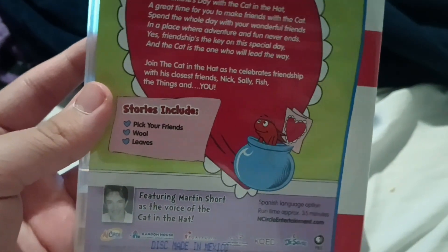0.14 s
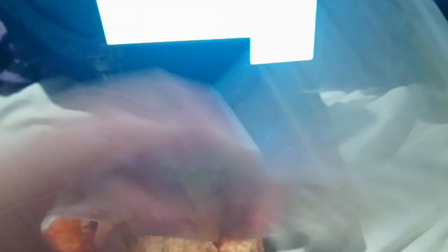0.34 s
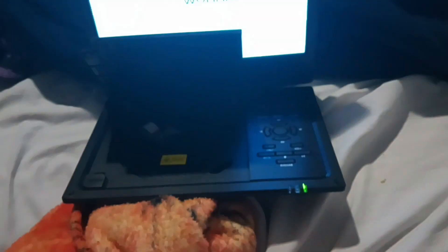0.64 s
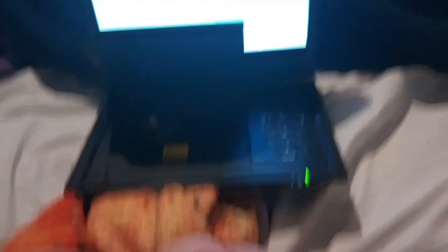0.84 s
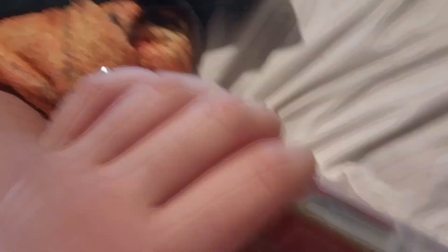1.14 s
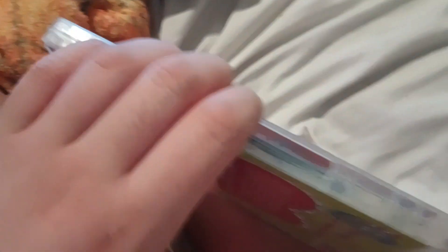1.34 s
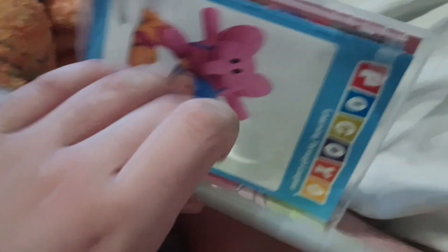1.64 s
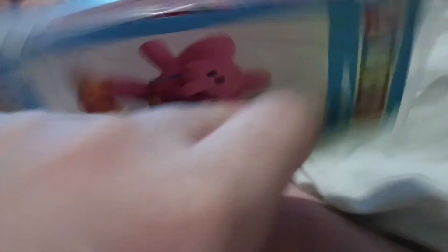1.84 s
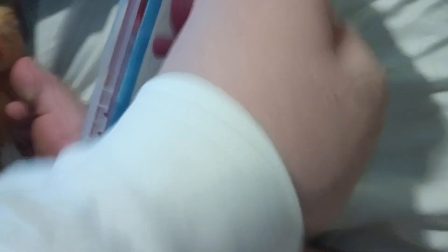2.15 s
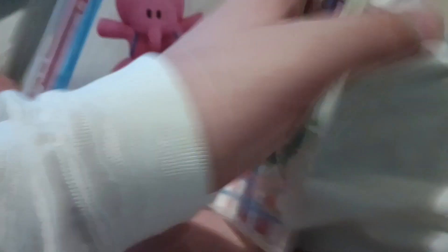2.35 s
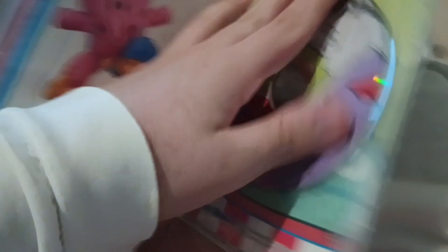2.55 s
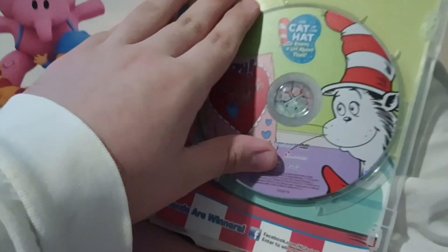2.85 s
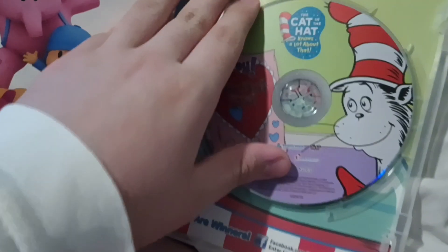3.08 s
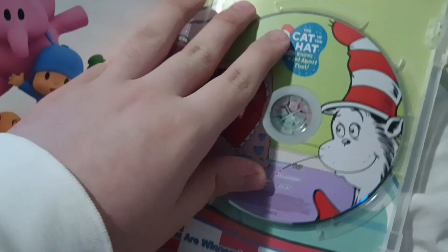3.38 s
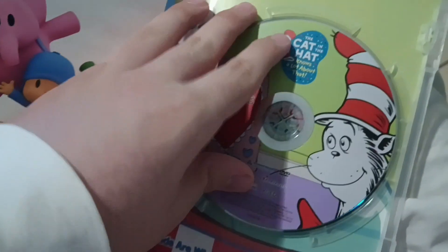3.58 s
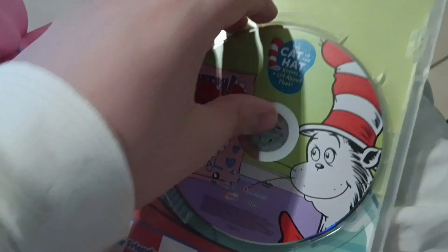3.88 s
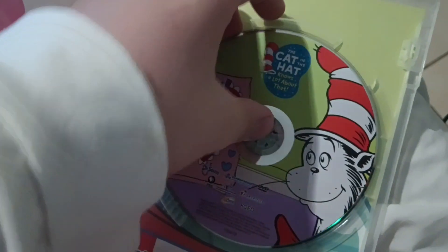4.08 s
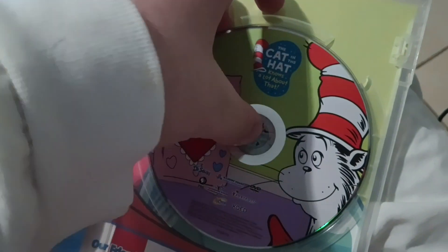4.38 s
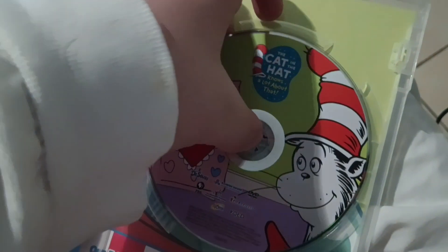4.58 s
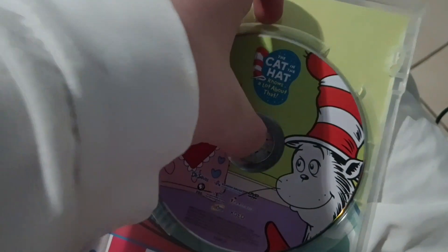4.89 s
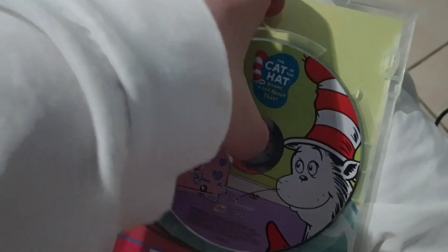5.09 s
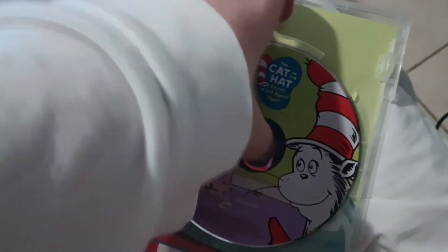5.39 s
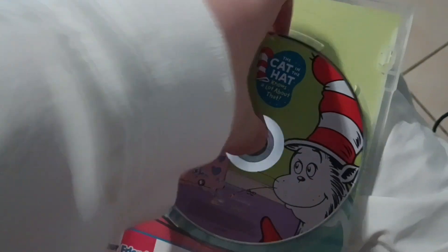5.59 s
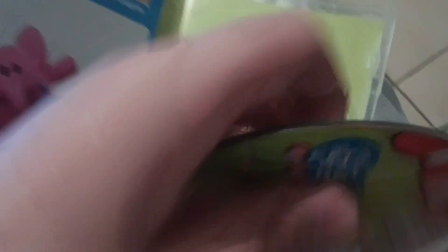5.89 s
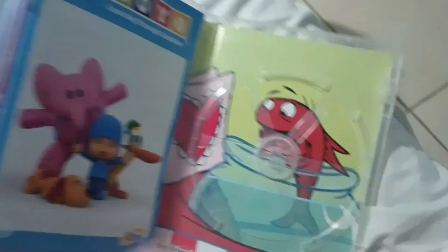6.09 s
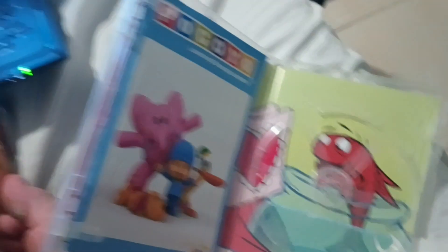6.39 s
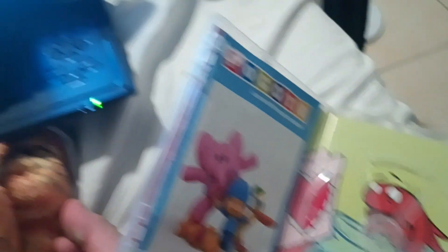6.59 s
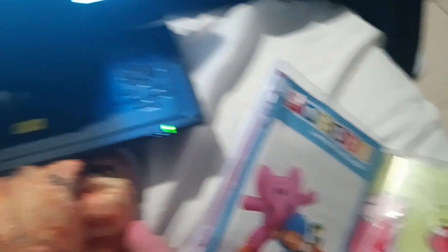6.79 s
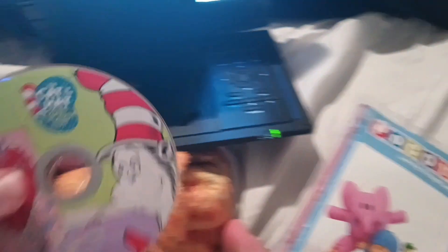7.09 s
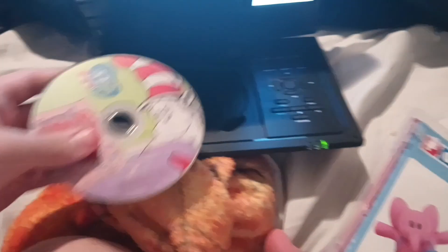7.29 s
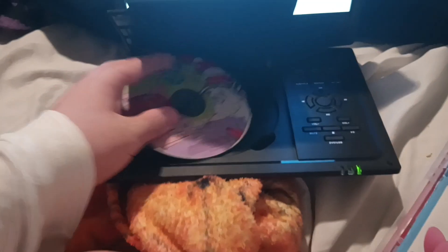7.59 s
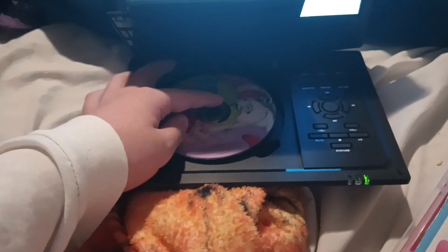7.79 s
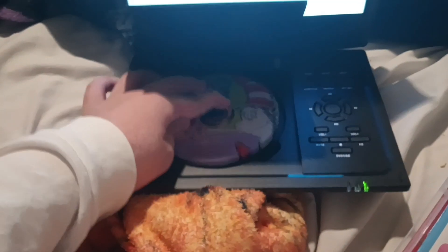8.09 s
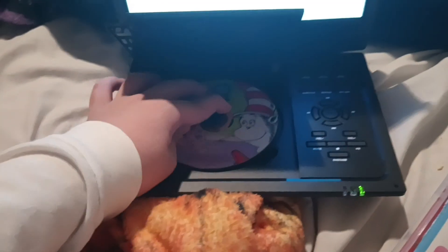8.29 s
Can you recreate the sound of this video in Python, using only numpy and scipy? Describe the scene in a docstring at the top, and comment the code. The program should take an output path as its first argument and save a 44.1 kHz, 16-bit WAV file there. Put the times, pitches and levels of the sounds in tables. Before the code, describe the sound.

Close plastic clicks and snaps as a disc is taken from its case and pressed into a portable player, with a fan humming softly.

```python
"""A plastic disc case, close to a phone's microphones, is turned over, snapped open and its disc
prised off the hub. An arm's length away the disc scrapes over a portable player's tray, drops in
and clicks onto the spindle. Every contact is a short crunch that rings the plastic; every rub
is a stream of tiny slips. Behind it all a fan hums in the small furnished room."""
import sys
import numpy as np
from scipy import signal
from scipy.fft import rfft, irfft
from scipy.io import wavfile
from scipy.ndimage import uniform_filter1d

SR = 44100
rng = np.random.default_rng(int(sys.argv[2]) if len(sys.argv) > 2 else 0)


def wav_out(sig):
    """Save sig, one row per channel (or a flat mono array), as 16-bit PCM at SR to the path in sys.argv[1]."""
    wavfile.write(sys.argv[1], SR, np.round(np.clip(np.atleast_2d(sig).T, -1, 1) * 32767).astype(np.int16))


N = 372204
TIME = np.arange(N) / SR
RING = 8192  # samples a contact is given to ring out

# latches and spine, close up: (time [s], level [dB], bass against it [dB], treble against it [dB],
# contact time [ms], left minus right [dB]); all snaps, clicks and knocks have these columns
LATCH_SNAPS = [(1.4739, -17.5, -4, -14.5, 0.84, -2), (1.4825, -14, -11, -19, 0.8, -2.5),
               (1.4915, -19, -12.5, -8, 1.7, -3.5), (1.5327, -25.5, -15, -12, 2.2, -6),
               (1.5711, -34.5, -5, -9.5, 2.2, -2), (1.6139, -32, -3, 0, 1.06, -3),
               (1.6564, -38.5, -2, -13, 1.6, -4), (1.6809, -40.5, -1, -6, .9, -1),
               (1.7149, -33.5, -10, -8.5, 1.4, -2.5), (1.7652, -35, -7.5, -13, 1.5, -3.5)]
# resonances of the shut case: (frequency [Hz], level [dB], t60 [s])
LATCH_MODES = [(149, 4, 0.064), (317, 3, 0.04), (397, 4.5, 0.077), (519, 0.5, .08), (976, -1, 0.037),
               (1240, -12, 0.026), (1735, -1, 0.076), (2210, 9, 0.029), (2684, 5, 0.053), (5700, -11, .02),
               (6800, 4, .025)]
# dry crack of the case, snapped or handled: (frequency [Hz], level [dB])
CASE_CRACK = [(28, -14), (50, 1), (100, -11.5), (250, 12.5), (600, -5), (1200, -4), (2600, 1.5),
              (4000, -13), (6500, -6.5), (8800, -12.5), (10500, -25), (15500, -35)]
def latches():
    """The latches burst open and the spine creaks, ringing the shell."""
    return contacts(LATCH_SNAPS, LATCH_MODES, CASE_CRACK, ring_db=-5, buzz_db=-28.5, buzz_s=0.029,
                    side=1, trim_db=(-1, -1, -1), detune_share=0.043)


# the hub's teeth, close up: columns as LATCH_SNAPS
HUB_SNAPS = [(5.028, -37, 2.5, -19.5, 0.93, -0.5), (5.153, -31, 0, -15, 1, 0.5),
             (5.2368, -45, -10.5, -16, 0.35, 1), (5.2468, -23, -18, -7, 0.57, 5),
             (5.2489, -18.5, -6.5, -3.5, 0.51, -2.5)]
# resonances of hub and disc: (frequency [Hz], level [dB], t60 [s])
HUB_MODES = [(148, -18.5, 0.17), (227.8, 1, 0.032), (830, -6.5, 0.038), (1455, -2.5, 0.016),
             (1860, 2.5, 0.026), (2710, 4.5, 0.019), (2950, 4.5, 0.018), (3100, -15.5, .1),
             (3220, -14, .12), (6900, -12, 0.028), (9420, -3, 0.016)]
# dry crack of the hub: (frequency [Hz], level [dB])
HUB_CRACK = [(60, -24.5), (210, 0.5), (400, 1.5), (900, -5), (2200, -2.5), (2900, 1), (4000, -14),
             (5500, -13.5), (7000, -4), (8000, -7), (9400, -7.5), (10800, -17), (15500, -23.5)]
def hub_release():
    """The hub's teeth slip, then let the disc go; both ring."""
    return contacts(HUB_SNAPS, HUB_MODES, HUB_CRACK, ring_db=-1.5, buzz_db=-31, buzz_s=0.036,
                    side=1, trim_db=(0, 0, 0), detune_share=0.0052)


# the case in the hand, close up, and the disc lifting off near 5.7 s: columns as LATCH_SNAPS
CASE_CLICKS = [(0.218, -43, -2.5, -25, 1.3, -3), (0.2598, -42, -9, -15, 2.4, -3),
               (0.3245, -39, -10, -11.5, 1.6, -1), (0.487, -49.5, -18, 5.5, 2.3, 1),
               (0.4988, -24.5, -10, -17, 2.14, -2), (1.0181, -44.5, -13, -13, 1.2, -7),
               (2.1253, -46, 7.5, -7, 1.6, -5), (2.1865, -36.5, -5, -4.5, 3.2, -3),
               (2.214, -36.5, -9, -7.5, 4.7, -11), (2.5065, -34, -4.5, -3, 1.7, 4),
               (2.5145, -37.5, -10, -2.5, 2.2, 1), (2.5903, -39, -16, -19, 2.1, 1),
               (2.6771, -43, -6, -10.5, 1.9, 0), (2.7195, -49, 10.5, -12, 0.52, 1),
               (3.2787, -41, -7, -11, 0.89, 0), (3.7436, -40.5, -3, -15, 0.69, -2),
               (3.7676, -49, -8, -7, 1.1, 0), (3.8684, -42.5, -5, -9, 0.85, 0),
               (5.5021, -53, 8.5, -25, 0.5, 0), (5.6817, -52, 12, -5.5, 2.7, 1),
               (5.7022, -54, 9, -5, 4.2, 1)]
# resonances of the held case: (frequency [Hz], level [dB], t60 [s])
CASE_MODES = [(132, -10, 0.073), (230, -6.5, 0.022), (411, 2.5, 0.017), (875, -8, 0.032),
              (1634, -5.5, 0.026), (1770, -22, 0.017), (2682, 3, 0.026), (3107, -8, 0.036),
              (6700, -5.5, 0.025), (10140, -9, 0.017)]
def case_handling():
    """Fingers knock and flex the case; the last soft bumps come as the disc lifts off."""
    return contacts(CASE_CLICKS, CASE_MODES, CASE_CRACK, ring_db=-8.5, buzz_db=-19, buzz_s=0.015,
                    side=1, trim_db=(-1, -1.3, -1.5), detune_share=0.057)


# the lid lands and settles, a little right: (time [s], frequency [Hz], level [dB], t60 [s])
LID_BUMPS = [(2.1, 308, -25, 0.038), (2.108, 133, -27, 0.32), (2.7209, 190, -34.5, .04),
             (2.72, 660, -30.5, 0.011)]
def lid():
    """The open lid bumps down softly and its panel booms."""
    out = 0
    for s, hz, db, t60 in LID_BUMPS:
        t = np.maximum(TIME - s, 0)
        out = out + undb(db) * np.sin(2 * np.pi * hz * t) * decay(t, t60)
    return out * pan(-3.1)


# disc on tray, at arm's length: columns as LATCH_SNAPS
TRAY_KNOCKS = [(7.4842, -37, -5, -18.5, 1.8, 2), (7.5285, -41.5, -9, -21, 1.3, -1),
               (7.558, -43, -6, -19, 1.4, 3), (7.6228, -44, -19, -26, 2, -3),
               (7.7031, -42.5, -8, -17, 1.5, -9), (7.7225, -28.5, -4.5, -12, 1.9, 5),
               (7.7311, -18, -14, -19, 2.3, -3), (7.7425, -28.5, -3, -11.5, 0.96, 1),
               (7.7505, -34.5, -23, -25, 4.4, -17), (7.763, -34, -5.5, -18, 5, -3),
               (7.8348, -29, -7, -8.5, 1.8, -2.5), (7.846, -43.5, 4.5, -21, 1.9, 2)]
# resonances of the tray: (frequency [Hz], level [dB], t60 [s])
TRAY_MODES = [(264, -22, 0.025), (603, -3.5, 0.04), (919, -8.5, 0.12), (1208, -6.5, 0.095),
              (1444, -3.5, 0.086), (1750, -3, 0.038), (2215, 5.5, 0.05), (2537, 11.5, 0.028),
              (6370, -19, .04), (8200, 6, 0.026)]
# dry crack of the tray: (frequency [Hz], level [dB])
TRAY_CRACK = [(60, -40), (200, -5.5), (600, -8), (1400, -4), (2600, -5.5), (4000, -13.5), (5500, -10),
              (7500, -3.5), (11000, -17.5), (15500, -28)]
def tray_knocks():
    """The disc knocks on the tray and drops in with a short, hard chatter."""
    return contacts(TRAY_KNOCKS, TRAY_MODES, TRAY_CRACK, ring_db=-5, buzz_db=6, buzz_s=0.0082,
                    side=0.99, trim_db=(0, -1, -0.7), detune_share=0.019)


# disc on spindle, at arm's length: columns as LATCH_SNAPS
SPINDLE_SNAP = [(8.0855, -41.5, 5.4, -6, 1.8, 8), (8.091, -23.5, 1.1, -3, 0.86, -3)]
# resonances of the spindle: (frequency [Hz], level [dB], t60 [s])
SPINDLE_MODES = [(129, -26, 0.36), (328, -10, 0.054), (493, 0.5, 0.041), (590, 2.5, 0.035),
                 (1320, 8, 0.023), (1463, -1.5, 0.067), (2270, -12, .04), (2880, -1.5, 0.019),
                 (4940, -15, 0.079), (7200, -15.5, 0.15), (7360, -9, 0.03)]
# dry crack of the spindle: (frequency [Hz], level [dB])
SPINDLE_CRACK = [(60, -13), (300, 2), (600, -3), (1400, 7), (3000, 4.5), (4000, -11), (4900, -5.5),
                 (7500, -1), (11000, -9.5), (15500, -14)]
def spindle_snap():
    """The disc rides up the spindle's catch and snaps home."""
    return contacts(SPINDLE_SNAP, SPINDLE_MODES, SPINDLE_CRACK, ring_db=2, buzz_db=-21, buzz_s=0.022,
                    side=0.96, trim_db=(0.7, 0, 0), detune_share=0.0074)


def contacts(rows, modes, crack_colour, ring_db, buzz_db, buzz_s, side, trim_db, detune_share):
    """Each contact is a crunch that swells and dies, a buzz of loose plastic, and the body's ring."""
    out, t = np.zeros((2, N + RING)), np.arange(RING) / SR
    for s, db, bass_db, treble_db, contact_ms, pan_db in rows:
        age = t / (contact_ms / 1000)
        onset = 1 - np.exp(-age)
        # the plastic bends, gives way, then chatters unevenly against the parts it touches
        crunch = age * np.exp(-age ** 1.33 / 2)
        chatter = undb(5.3 * unit(uniform_filter1d(rng.standard_normal(RING), size=90)))
        force = crunch + undb(buzz_db) * chatter * np.exp(-t / buzz_s) * onset
        crack = unit(colour(mic_noise(RING, side) * force, crack_colour))
        ring = undb(ring_db) * unit(body_ring(modes, detune_share, t) * onset)
        bass, middle, treble = three_bands(crack + ring)
        bands = bass.mean(axis=0), middle, treble  # long waves reach both microphones alike
        # the spot struck sets the balance of thud and tick; trim_db offsets each band
        levels_db = db + np.add((bass_db, 0, treble_db), trim_db)
        start = int(s * SR)
        for band, band_db in zip(bands, levels_db):
            burst = unit(band) * np.sqrt(0.01 * SR / RING)  # the energy of 10 ms at rms 1
            out[:, start:start + RING] += burst * undb(band_db) * pan(pan_db)
    return out[:, :N]


def body_ring(modes, detune_share, t):
    """The grip detunes and weights the modes anew; each microphone hears its own phase."""
    ring = 0
    for hz, db, t60 in modes:
        detune, weight_db, phase, spread = rng.standard_normal(4)
        lead = np.array([[1], [-1]]) * spread * min(hz / 2000, 1)
        wave = np.sin(2 * np.pi * hz * (1 + detune_share * detune) * t + phase + lead)
        ring = ring + undb(db + weight_db) * wave * decay(t, t60)
    return ring


# pushes over the tray, centre: (time [s], length [s], level [dB])
SLIDES = [(7.495, 0.071, -49), (7.595, 0.076, -39), (7.74, 0.029, -39)]
# their spectrum: (frequency [Hz], level [dB])
SLIDE_COLOUR = [(200, -20), (450, 0), (700, -7), (950, 6), (1400, 0.5), (2400, -0.5), (3000, -10.5),
                (4200, -20.5), (7500, -27.5), (15000, -47)]
def disc_slide():
    """The disc's face rubs over the tray."""
    pressure = strokes(SLIDES, attack_s=0.016, release_s=0.0093)
    return friction(pressure, SLIDE_COLOUR, slips_per_s=3000, spread_db=4, flutter_db=0.5, pan_db=0)


# scratches of the rim, well to the right: (time [s], length [s], level [dB])
SCRATCHES = [(7.485, .04, -46), (7.56, 0.099, -50), (7.587, 0.0092, -44.5), (7.703, 0.01, -45.5)]
# their spectrum: (frequency [Hz], level [dB])
SCRATCH_COLOUR = [(400, -25), (1000, -26), (1900, -7), (2300, -5), (2650, 6.5), (3000, -11), (3900, -31),
                  (7500, -24), (15000, -59)]
def rim_scratch():
    """The disc's rim scratches along the tray's edge."""
    pressure = strokes(SCRATCHES, attack_s=0.0033, release_s=0.0059)
    return friction(pressure, SCRATCH_COLOUR, slips_per_s=2500, spread_db=5, flutter_db=2.1, pan_db=-9)


# soft strokes, close on the right: (time [s], length [s], level [dB])
BRUSHES = [(0.55, 0.065, -62), (0.795, 0.024, -60), (0.98, 0.42, -62.5), (1.63, 0.19, -61.5),
           (1.91, 0.39, -56), (2.44, 0.19, -54), (3.65, .25, -65), (5.68, 0.053, -59), (5.9, .25, -67.5),
           (6.2, 0.93, -67.5)]
# their spectrum: (frequency [Hz], level [dB])
BRUSH_COLOUR = [(400, -12), (2500, 11), (4200, -6.5), (7300, -1), (9000, -8), (10500, -19.5), (15500, -24)]
def finger_brush():
    """Fingers and sleeve brush over the plastic."""
    pressure = strokes(BRUSHES, attack_s=0.02, release_s=0.051)
    return friction(pressure, BRUSH_COLOUR, slips_per_s=6000, spread_db=2, flutter_db=2, pan_db=-4)


def strokes(rows, attack_s, release_s):
    """Each stroke's pressure swells up to its time, holds for its length and dies away."""
    pressure = 0
    for s, length, db in rows:
        before, after = np.maximum(s - TIME, 0), np.maximum(TIME - s - length, 0)
        pressure = pressure + undb(db) * np.exp(-before / attack_s - after / release_s)
    return pressure


def friction(pressure, spectrum, slips_per_s, spread_db, flutter_db, pan_db):
    """Dense little slips of uneven size, as loud as the pressure behind them."""
    slips = (rng.random(N) < slips_per_s / SR) * undb(spread_db * rng.standard_normal(N))
    grain = unit(colour(mic_noise(N, side=0.8) * slips, spectrum))
    return grain * pressure * undb(flutter_db * drift(90)) * pan(pan_db)


# the fan's air across the room: (frequency [Hz], level [dB])
FAN_COLOUR = [(15, -53.5), (25, -26), (49, -16.5), (69, -24), (109, -9), (167, -10.5), (186, -10.5),
              (237, -1.5), (271, -9), (404, -12.5), (475, -14), (790, -14.5), (2180, -22.5), (3930, -26),
              (15000, -72.5)]
# its stereo width: (frequency [Hz], side minus mid [dB])
FAN_SIDE = [(60, -6.5), (110, -7.5), (200, -15), (380, -8.5), (700, -3), (1300, 0), (2400, 0), (8000, 1)]
# its broad peaks and dips: (frequency [Hz], width [Hz], gain [dB])
AIR_RESONANCES = [(235, 190, -4.5), (613, 485, -6.5), (821, 150, 4), (1340, 280, 1), (2210, 430, 4.5),
                  (4460, 2610, -13.5), (7640, 1860, 5)]
def fan_air():
    """The fan's rush of air, diffuse in the treble."""
    mid, side = rng.standard_normal((2, N))
    side = colour(side, FAN_SIDE)
    air = colour(np.array([mid + side, mid - side]), FAN_COLOUR)
    f = freqs(air)
    bumps_db = sum(db * np.exp(-(2 * (f - hz) / width) ** 2) for hz, width, db in AIR_RESONANCES)
    # reflections from nearby walls ripple the spectrum
    lags_s = rng.uniform(0.0018, 0.018, size=12)
    ripple = unit(sum(np.cos(2 * np.pi * f * lag) for lag in lags_s))
    air = unit(shape(air, undb(bumps_db + 0.27 * ripple * f / (f + 400))))
    air *= undb(0.27 * drift(7))
    shade = pan(-5 * f / (f + 300))  # the phone's body shades the left microphone above the bass
    return shape(air, shade) * undb(-46.5)


# the fan's tones: (frequency [Hz], level [dB])
FAN_TONES = [(99, -63.5), (119.5, -63), (199.5, -57), (240.5, -55)]
def fan_hum():
    """Motor and blade tones waver in pitch and level."""
    hum = 0
    for hz, db in FAN_TONES:
        phase = 2 * np.pi * np.cumsum(hz + 1.09 * drift(12)) / SR
        hum = hum + unit(np.sin(phase) * undb(1.26 * drift(11))) * undb(db)
    return hum * pan(-1.5)


def fan_fade(start_s=5.17, drop_db=2.5, drop_s=0.08, sink_db=2, sink_s=1.7):
    """The fan's level drops a little as the disc comes free, then slowly sinks further."""
    since = np.maximum(TIME - start_s, 0)
    return undb(drop_db * np.expm1(-since / drop_s) + sink_db * np.expm1(-since / sink_s))


# the room's reverberation: (frequency [Hz], level [dB], t60 [s])
ROOM_BANDS = [(125, -9.5, 0.2), (400, -7, 0.44), (1000, 1.5, 0.24), (3000, -0.5, 0.23), (7000, 2.5, 0.24),
              (13000, 0, 0.053)]
def room(x, wet_db, build_s):
    """A small furnished room adds a diffuse tail that builds quickly and dies by band."""
    t = np.arange(2 * RING) / SR
    noise = mic_noise(len(t), side=0.17)
    centres = np.log(np.array(ROOM_BANDS)[:, 0])
    tail = 0
    for (_, db, t60), pick in zip(ROOM_BANDS, np.eye(len(ROOM_BANDS))):
        band = shape(noise, np.interp(np.log(freqs(noise)), centres, pick))
        tail = tail + undb(db) * band * decay(t, t60)
    build = 1 - np.exp(-(t / build_s) ** 2)
    tail = unit(tail * build) / np.sqrt(len(t))
    return x + undb(wet_db) * signal.fftconvolve(x, tail, axes=1)[:, :N]


def undb(db):
    """Decibels to gain."""
    return 10 ** (np.asarray(db) / 20)


def unit(x):
    """Scale each channel to rms 1."""
    return x / np.sqrt(np.mean(x ** 2, axis=-1, keepdims=True))


def decay(t, t60):
    """Fall by 60 dB every t60 seconds."""
    return np.exp(-np.log(1000) * t / t60)


def freqs(x):
    """Frequency of each spectral bin of x."""
    return np.maximum(np.arange(x.shape[-1] // 2 + 1) * SR / x.shape[-1], 1)


def shape(x, gain):
    """Filter by one gain per bin."""
    return irfft(rfft(x) * gain, x.shape[-1])


def colour(x, points):
    """Causal filter through (frequency [Hz], level [dB]) points."""
    hz, db = np.transpose(points)
    gain = undb(np.interp(np.log(freqs(x)), np.log(hz), db))
    cepstrum = irfft(np.log(gain), x.shape[-1])
    cepstrum[1:] *= 2
    cepstrum[len(cepstrum) // 2:] = 0
    return shape(x, np.exp(rfft(cepstrum)))


def three_bands(x, bass_hz=700, treble_hz=4000):
    """Bass, middle and treble of a sound."""
    edges = ((bass_hz, "low"), ([bass_hz, treble_hz], "band"), (treble_hz, "high"))
    return [signal.sosfilt(signal.butter(4, hz, kind, fs=SR, output="sos"), x) for hz, kind in edges]


def pan(db):
    """Microphone gains for a left-minus-right level."""
    return undb(np.array([[db], [-db]]) / 2).reshape(2, -1)


def drift(rate_hz):
    """Slow random drift of rms 1."""
    hold = int(SR / rate_hz)
    steps = np.repeat(rng.standard_normal(N // hold + 1), hold)
    return unit(uniform_filter1d(steps, hold)[:N])


def mic_noise(count, side):
    """Noise at the two microphones: alike at side 0, unrelated at 1."""
    mid, apart = rng.standard_normal((2, count))
    return (mid + side * np.array([apart, -apart])) / np.sqrt(1 + side ** 2)


def scene():
    """The case is near the phone, the player an arm's length away, the fan behind both."""
    case = case_handling() + latches() + lid()
    hub = hub_release()
    player = tray_knocks() + spindle_snap()
    brush = finger_brush()
    scrape = rim_scratch() + disc_slide()
    near = room(case + brush, wet_db=-12.5, build_s=0.0024) + room(hub, wet_db=-15, build_s=0.0058)
    far = room(player + scrape, wet_db=-12.5, build_s=0.0012)
    return near + far + (fan_air() + fan_hum()) * fan_fade()


def record(dry, low_hz=45, top_hz=15900, drive=0.7):
    """The phone drops the deepest bass, rounds the very loudest peaks and cuts the top."""
    thin = signal.sosfilt(signal.butter(4, low_hz, "high", fs=SR, output="sos"), dry)
    rounded = np.tanh(drive * thin) / drive
    return signal.sosfilt(signal.ellip(10, 0.2, 80, top_hz, fs=SR, output="sos"), rounded)


dry = scene()
out = record(dry)
wav_out(out)
```